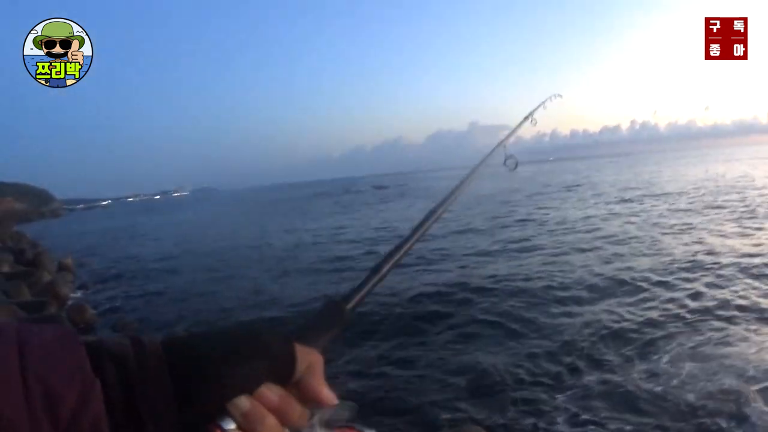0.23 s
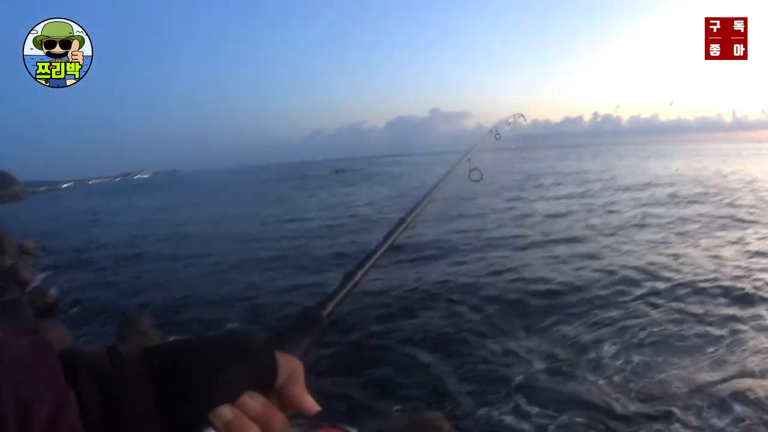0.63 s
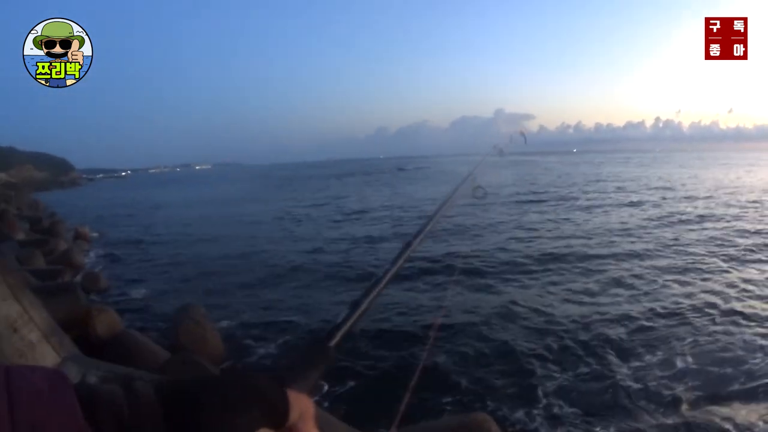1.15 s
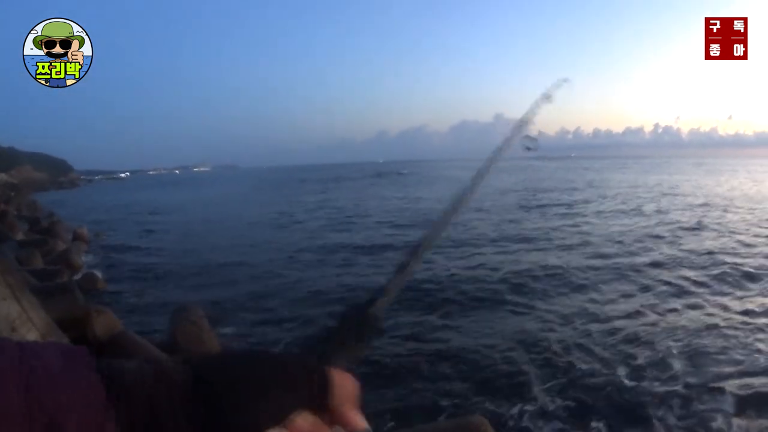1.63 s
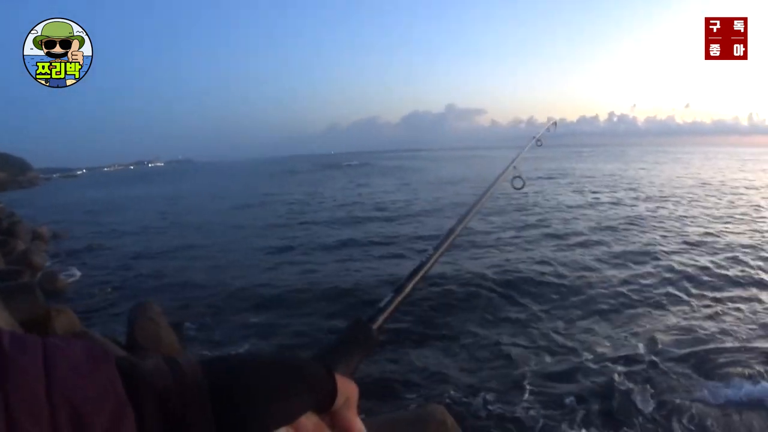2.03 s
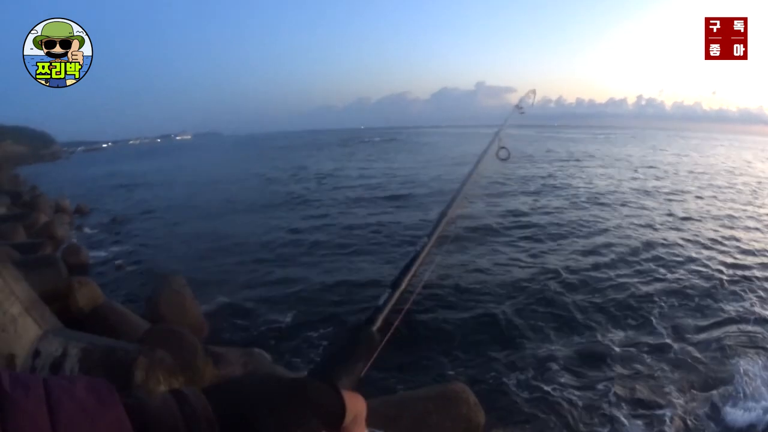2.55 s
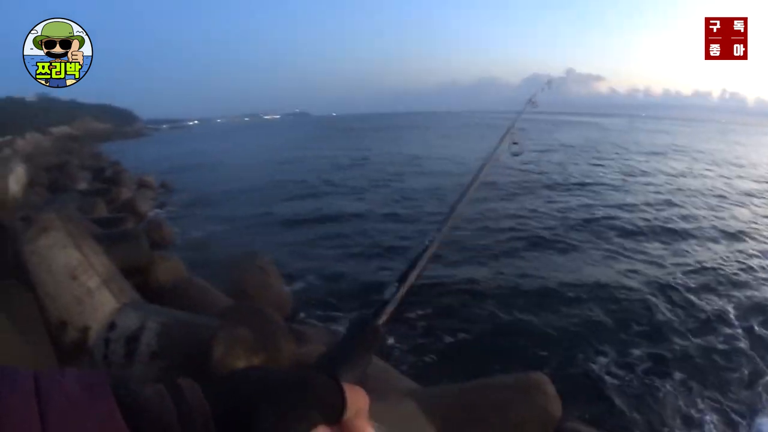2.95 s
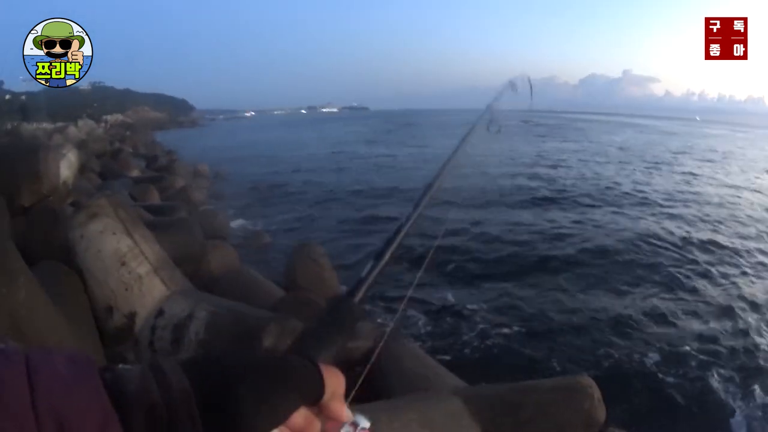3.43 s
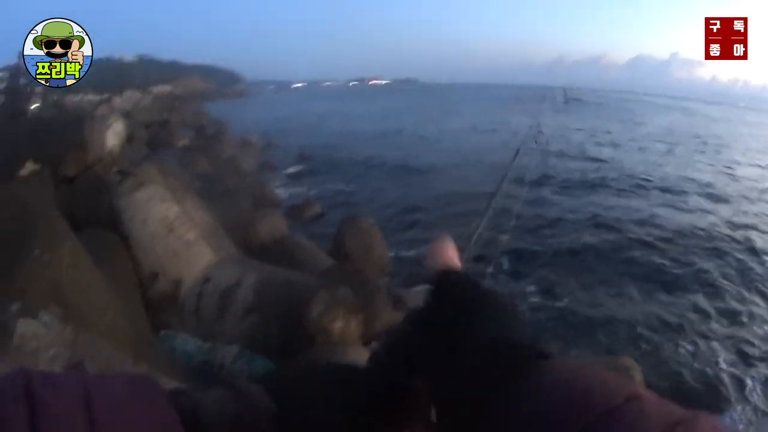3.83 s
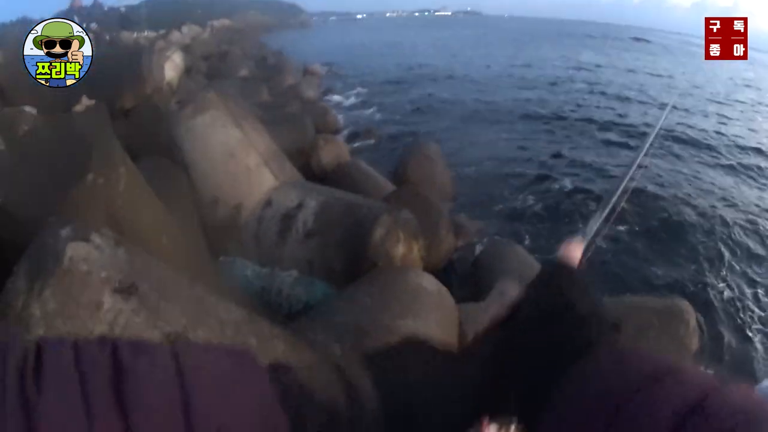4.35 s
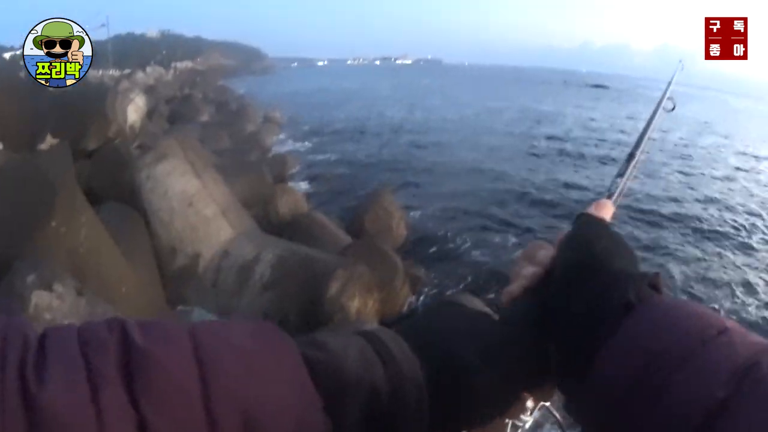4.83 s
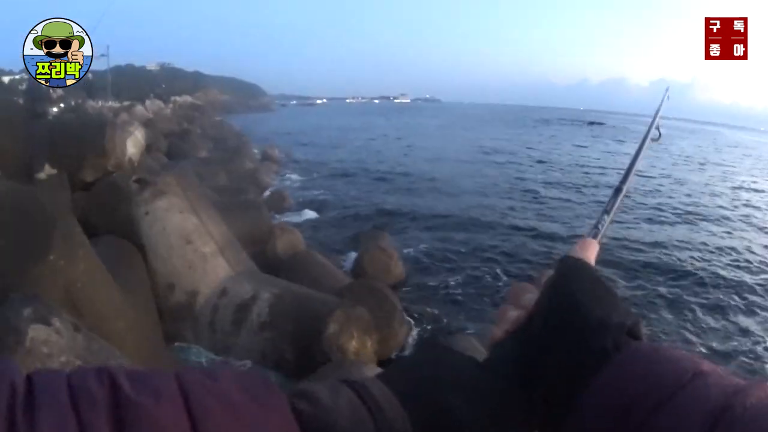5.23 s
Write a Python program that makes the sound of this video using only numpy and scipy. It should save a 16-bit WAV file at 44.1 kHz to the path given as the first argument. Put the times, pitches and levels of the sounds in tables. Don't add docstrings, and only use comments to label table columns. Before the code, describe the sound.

Small waves wash and slap against concrete breakwater blocks, gulping and fizzing, with bubble plops and a few sharp fishing tackle ticks close by.

```python
import sys
import numpy as np
from scipy import signal
from scipy.fft import rfft, irfft
from scipy.io import wavfile
from scipy.ndimage import uniform_filter1d

SR = 44100
rng = np.random.default_rng(int(sys.argv[2]) if len(sys.argv) > 2 else 0)


def put_to_file(sound):
    columns = np.atleast_2d(sound).T
    safe = np.clip(columns, -1, 1)
    whole_steps = np.round(safe * 32767)
    wavfile.write(sys.argv[1], SR, whole_steps.astype(np.int16))


def volts(x):
    e = np.asarray(x, float) / 20
    return 10 ** e


N = 242550

HOP, WINDOW = 128, 512
FRAME_S = np.arange(-(-N // HOP) + 1) * HOP / SR
BIN_HZ = np.fft.rfftfreq(WINDOW, 1 / SR)
OCTAVE = np.log2(BIN_HZ / 1000 + 0.038)[:, None]
SEA_DB = -33


def evened(x):
    return x / np.sqrt(np.mean(x ** 2) + 1e-20)


def read(points, hz):
    f, value = np.transpose(points)
    return np.interp(np.log(hz + 1), np.log(f + 1), value)


def add(mix, s, sound):
    part = mix[round(s * SR):][:len(sound)]
    part += sound[:len(part)]


def swelling(t, rise, t60):
    shape = (1 - np.exp(-t / rise)) ** 2 * volts(-60 * t / t60)
    return shape / shape.max()


# t/s, peak level/dB, ring f/Hz, time to fall 60 dB/s, left minus
# right level/dB
TICK_EVENTS = [
    (0.1625, -10.5, 4720, 0.0045, 1),
    (0.6529, -26, 4450, 0.005, 3),
    (3.3055, -19, 5400, 0.004, 2),
    (3.438, -19, 5080, 0.0058, 2),
    (3.9559, -17.5, 5100, 0.0066, -3),
    (4.2088, -14, 4670, 0.005, 2),
    (5.4094, -31.5, 4780, 0.005, -4),
               (1.256, -32, 6490, 0.004, 2.0),
    (5.2615, -21, 6800, 0.004, 2.0),
]
DROP_EVENTS = [(0.7188, -42, 9000, 0.003, -1.0), (0.9926, -36, 9630, 0.003, -1.5),
               (1.0074, -40, 8740, 0.003, -0.5), (1.2276, -41, 11300, 0.003, -1.5),
               (3.8906, -50, 9540, 0.003, -1.0), (4.5454, -44, 8600, 0.003, -0.5),
               (5.1774, -51, 8980, 0.003, 0.0), (5.2894, -32, 8600, 0.0027, -1.0)]


def ticks():
    out, t = np.zeros((2, N)), np.arange(1000) / SR
    partials = [(1.0, -1.5), (1.2, -9), (1.33, -17), (0.62, -10)]
    for s, db, hz, t60, pan_db in TICK_EVENTS + DROP_EVENTS:
        ring = sum(volts(d) * np.sin(2 * np.pi * hz * k * t) for k, d in partials)
        tick = volts(db - 5) * swelling(t, 0.00061, max(t60, .002)) * ring
        add(out[0], s - .0003, tick * volts(pan_db / 2))
        add(out[1], s - .0003, tick / volts(pan_db / 2))
    return out


# t/s, peak level/dB, pitch f/Hz, time to fall 60 dB/s, overtone share
PLOP_EVENTS = [(0.099, -31, 824, 0.04, 0.5), (0.139, -28.5, 727, 0.036, 0.5), (0.229, -27, 480, 0.019, 0.5),
               (0.266, -27.5, 580, 0.021, 0.6), (0.408, -32.5, 353, 0.029, 0.41),
               (0.582, -39, 498, 0.042, 0.4), (1.993, -34, 1070, 0.037, 0.5),
               (2.026, -34, 1330, 0.04, 0.46), (2.033, -26.5, 1183, 0.091, 0.54),
               (2.629, -30, 394, 0.053, 0.5), (3.194, -26.5, 635, 0.1, 0.5),
               (3.319, -32.5, 980, 0.047, 0.42), (3.335, -34, 533, 0.044, 0.5),
               (3.62, -30.5, 560, 0.04, 0.58), (4.012, -30, 474, 0.04, 0.44), (4.333, -26, 552, 0.032, 0.5),
               (4.349, -25.5, 428, 0.044, 0.75), (4.389, -28, 684, 0.072, 0.5),
               (4.444, -27, 660, 0.045, 0.5), (4.674, -26.5, 540, 0.026, 0.5),
               (4.689, -35, 1010, 0.04, 0.58), (5.098, -29, 536, 0.051, 0.37),
               (5.481, -24, 474, 0.033, 0.69),
               (0.099, -30, 1030, 0.025, 0.1), (0.266, -29.5, 1300, 0.03, 0.1),
               (2.1545, -28, 1960, 0.025, 0.1), (2.6394, -34, 2490, 0.025, 0.1),
               (3.6592, -29, 1260, 0.025, 0.1), (4.6714, -28, 1260, 0.015, 0.1)]


def plops():
    out, t = np.zeros(N), np.arange(3000) / SR
    for s, db, hz, t60, share in PLOP_EVENTS:
        turns = hz * t * (.98 + 1.48 * t)
        overtone = share * np.sin(2 * np.pi * 2.01 * turns) * volts(-60 * t / 0.058)
        ring = np.sin(2 * np.pi * turns) + overtone
        add(out, s - .001, volts(db - 3.0) * swelling(t, 0.00088, max(t60, .008)) * ring)
    bass_cut = signal.butter(3, 250, "highpass", fs=SR, output="sos")
    return signal.sosfilt(bass_cut, out)


# t/s, wave level/dB, foam against wash level/dB
SEA_STRENGTH = [(0, -38, -1.5), (.28, -37, -1.5), (.52, -41.5, 0.8), (.68, -38.5, 1.8), (.95, -36.5, 0),
                (1.3, -37, -1), (1.45, -35, -0.2), (1.85, -31, 3), (2.08, -31, 2.5), (2.3, -35.5, 0.5),
                (2.62, -36, 1), (2.77, -40, -1.7), (3.06, -35.5, 2.2), (3.22, -38, 1.2), (3.84, -35, 0.3),
                (4.41, -27, -.6), (4.75, -33.5, -2), (5.5, -33, -2.1)]
LAYER_CENTRES = [85, 170, 450, 1800, 4800, 9000]
WAVE_FOLLOW = [0, 1.15, 0.84, 1, 0.98, 0.87]
FOAM_FOLLOW = [0, -.9, -.6, -.45, .55, .6]


def wave_layers():
    s, wave_db, foam_db = np.transpose(SEA_STRENGTH)
    wave_moves = np.outer(WAVE_FOLLOW, np.interp(FRAME_S, s, wave_db))
    foam_moves = np.outer(FOAM_FOLLOW, np.interp(FRAME_S, s, foam_db))
    log_hz, centres = np.log(BIN_HZ + 1), np.log(LAYER_CENTRES)
    share = np.array([np.interp(log_hz, centres, row) for row in np.eye(len(centres))])
    return share.T @ (wave_moves + foam_moves)


# t/s, lift level/dB, hollow pitch f/Hz, length/s
GULP_EVENTS = [(0.11, 5.5, 490, 0.047), (.29, 7.5, 348, .05), (0.398, 4, 416, 0.034),
               (0.662, 8, 302, 0.092), (.84, 6, 400, .05), (0.956, 7, 253, 0.11), (1.393, 0, 450, .08),
               (1.74, 2, 520, 0.12), (1.928, 4.5, 474, 0.04), (2.05, 5, 220, 0.17), (2.6, 2.5, 250, 0.054),
               (2.64, 3.5, 600, 0.035), (3.058, 3.5, 480, 0.15), (3.3, 2.5, 506, .1),
               (3.696, 6, 460, 0.029), (3.8, 2.5, 190, 0.06), (3.9, 4.5, 467, 0.035), (4.082, 3, 420, 0.2),
               (4.362, 9, 207, 0.024), (4.405, 4, 520, 0.045), (4.55, 6.5, 190, 0.095),
               (4.675, 4.5, 480, 0.063), (4.86, 5, 260, 0.087), (4.97, 1, 482, 0.09),
               (5.097, 6, 350, 0.023), (5.284, 8, 260, 0.063), (5.49, 2.5, 480, 0.088)]
SPRAY_EVENTS = [(1.42, 3, 9100, .06), (1.65, 2.2, 10000, 0.073), (1.72, 1.2, 2200, .06),
                (1.85, 0.98, 7000, 0.052), (2.64, 3, 2500, 0.046), (2.8, 1.8, 11000, 0.14),
                (3.1, 1.5, 11000, 0.12), (3.6, 2.9, 11000, 0.059), (3.96, 3, 3000, 0.083),
                (4.15, 1.1, 9000, 0.044), (4.4, 1.7, 2200, 0.047), (4.51, 1.9, 2200, .04),
                (4.6, 1.9, 1500, .04), (4.95, 1.9, 900, .03), (4.35, 1.8, 11000, .06),
                (4.56, 2.5, 12100, .06), (4.88, 2, 5000, .06), (5.13, 3.4, 9000, 0.057),
                (5.43, 1.6, 3000, .06)]


def gulps_and_sprays():
    lift = np.zeros((len(BIN_HZ), len(FRAME_S)))
    for events, octaves_wide in (GULP_EVENTS, 1), (SPRAY_EVENTS, 1.25):
        for at, lift_db, mid_hz, length in events:
            near_pitch = np.exp(-((OCTAVE - np.log2(mid_hz / 1000)) / octaves_wide) ** 2)
            lift += lift_db * near_pitch * np.exp(-((FRAME_S - at) / max(length, .01)) ** 2)
    return lift


# t/s, turned toward open water (about -1..1), tipped down (about -1..1)
CAMERA_AIM = [(0, 0.22, 0.27), (.3, 0.19, .1), (.96, 0.2, -0.42), (1.3, -.6, -0.67), (1.9, -0.11, 1.54),
              (2.6, -0.17, -.1), (3.9, -0.0019, -0.05), (4.5, 0.74, 0.21), (5.5, 1, -0.35)]
# f/Hz, half width f/Hz, level/dB per turn, level/dB per tip
HOUSING_DIPS = [
    (760, 104, 0.7, -4.5),
    (3350, 230, 1, -0.3),
    (12600, 1400, 3, -0.7),
]


def camera_moves():
    s, turned, tipped = np.transpose(CAMERA_AIM)
    change = 0
    for mid_hz, width, turn_db, tip_db in HOUSING_DIPS:
        band = np.exp(-((BIN_HZ - mid_hz) / width) ** 2)
        change = change + np.outer(band, np.interp(FRAME_S, s, turn_db * turned + tip_db * tipped))
    return change


def drift(bins, frames):
    noise = rng.standard_normal((len(BIN_HZ), len(FRAME_S)))
    return evened(uniform_filter1d(uniform_filter1d(noise, size=bins, axis=0), size=frames, axis=1))


def unrest(patchy_db, flicker_db, gust_db):
    high = np.clip(0.2 + 0.25 * OCTAVE, 0, 2)
    restless = flicker_db * drift(90, 3) + gust_db * drift(150, 14)
    return patchy_db * drift(6, 16) + high * restless


# t/s, peak level/dB, tilt level/dB per octave
SLAP_EVENTS = [(.289, -18, 1), (.389, -17.5, 2.5), (.719, -25, 8), (.899, -16.5, -1), (.949, -17, 1),
               (.979, -29, 6), (.999, -21, -1.5), (1.119, -26.5, -7.5), (1.229, -16.5, 1),
               (1.419, -22, -6.5), (1.499, -15, 4), (2.009, -9.5, 0), (2.099, -14, -1), (2.629, -15, 2),
               (3.299, -25, 6), (3.437, -21, 3), (3.639, -13, -0.2), (3.889, -11.5, 1.5),
               (3.958, -10.5, -.6), (4.129, -12.5, -3.5), (4.209, -17, 6), (4.339, -17, 3),
               (4.425, -23, -3), (4.673, -10.5, -4), (4.859, -13, 1.5), (4.959, -27.5, 2),
               (5.099, -16.5, 0), (5.179, -9, 0.5), (5.409, -18, -2.5), (5.479, -18, 4)]


def slaps():
    power = np.zeros((len(BIN_HZ), len(FRAME_S)))
    no_bass = np.clip(OCTAVE + 1.23, 0, 1)
    for at, db, tilt_db in SLAP_EVENTS:
        after = np.maximum(FRAME_S - at, 0)
        burst = (1 - np.exp(-after / 0.011)) * volts(-60 * after / 0.093)
        colour = volts(db - SEA_DB - 9.5 + tilt_db * (OCTAVE - 2.0)) * no_bass
        power += (burst * colour) ** 2
    return power


def sea_field():
    field = wave_layers() + gulps_and_sprays() + camera_moves()
    field -= 10 * np.log10(np.mean(volts(field) ** 2, axis=1, keepdims=True))
    field += unrest(patchy_db=1.07, flicker_db=1.0, gust_db=0.37)
    return 10 * np.log10(volts(field) ** 2 + slaps())


def shaped(x, db_field):
    z = signal.stft(x, nperseg=WINDOW, noverlap=WINDOW - HOP)[2]
    return signal.istft(z * volts(db_field), nperseg=WINDOW, noverlap=WINDOW - HOP)[1][:N]


def froth(per_s, spread_db, cycles):
    size = volts(spread_db * np.minimum(rng.exponential(1, N), 5))
    size *= rng.random(N) < per_s / SR
    kind, out = rng.integers(0, 30, N), np.zeros(N)
    for k, hz in enumerate(np.geomspace(300, 13000, 30)):
        u = np.arange(0, 4 * cycles, hz / SR)
        grain = np.sin(2 * np.pi * u * (1 + 0.027 * u)) * u * np.exp(-2 * u / cycles)
        grain *= np.sqrt(hz) / np.linalg.norm(grain)
        out += signal.oaconvolve(size * (kind == k), grain)[:N]
    return evened(out)


# f/Hz, level/dB per Hz
FAR_SWELL = [(20, -52), (45, -42), (70, -37), (100, -24.5), (125, -25.5), (160, -21)]
# f/Hz, level/dB per Hz
HOUSING_COLOUR = [(94, -53), (160, -20.5), (339, -4.5), (523, 0.5), (668, -1.5), (776, -5), (1240, -1.5),
                  (1610, -3.5), (2440, -2), (3360, -7), (4890, -1.5), (6250, -8.5), (9100, -23.5),
                  (12300, -27), (14300, -30)]


def sea():
    field = sea_field()
    grains = froth(per_s=5000, spread_db=2.5, cycles=3.25)
    near = shaped(rng.standard_normal(N) + volts(-7.0) * grains, field)
    apart = shaped(rng.standard_normal(N), field)
    hz = np.fft.rfftfreq(N, 1 / SR)
    in_swell = hz < FAR_SWELL[-1][0]
    colour = volts(np.where(in_swell, read(FAR_SWELL, hz), read(HOUSING_COLOUR, hz)))
    return volts(SEA_DB) * np.array([evened(irfft(rfft(x) * colour, N)) for x in (near, apart)])


# f/Hz, level/dB
PORT_DIFFERENCE = [(60, -13), (300, -20.5), (1300, -17.5), (3000, -21), (4500, -23.5), (7000, -19.5),
                   (9500, -10), (11000, -6.5), (12500, -3.5), (14300, -10)]
# f/Hz, left minus right level/dB
PORT_LEAN = [(60, -1.0), (180, -2), (530, -1.0), (1570, 0.5), (4660, 1), (13800, -0.5)]
# f/Hz, phase/radians
PORT_LEAD = [(0, -0.36), (950, 0.37), (3010, 0.18), (10800, -0.28), (12000, 0.39), (13200, 0.1),
             (14000, -0.0)]


def scene():
    near, apart = sea()
    hz = np.fft.rfftfreq(N, 1 / SR)
    mid = rfft(near + plops())
    side = volts(read(PORT_DIFFERENCE, hz)) * rfft(apart)
    lean = volts(read(PORT_LEAN, hz) / 2) * np.exp(.5j * read(PORT_LEAD, hz))
    return irfft(np.array([(mid + side) * lean, (mid - side) / lean]), N) + ticks()


def roll_off(x):
    return signal.sosfilt(signal.butter(12, 14440, fs=SR, output="sos"), x)


def record(dry):
    below_limit = np.fft.rfftfreq(N, 1 / SR) < 14400
    kept = irfft(rfft(dry) * below_limit, N)
    return roll_off(kept)


dry = scene()
out = record(dry)
put_to_file(out)
```